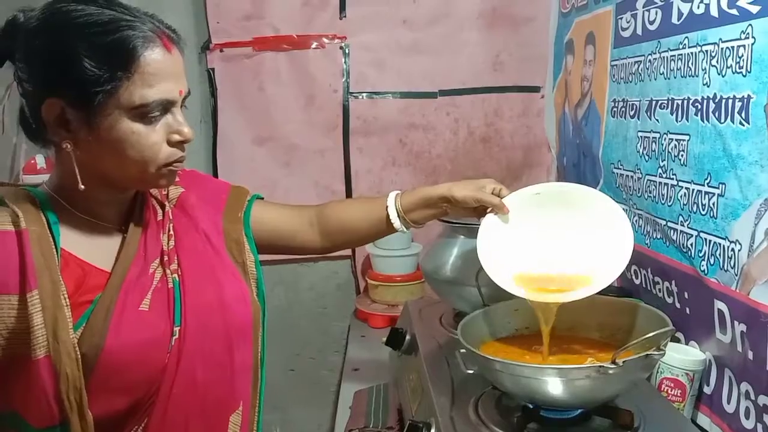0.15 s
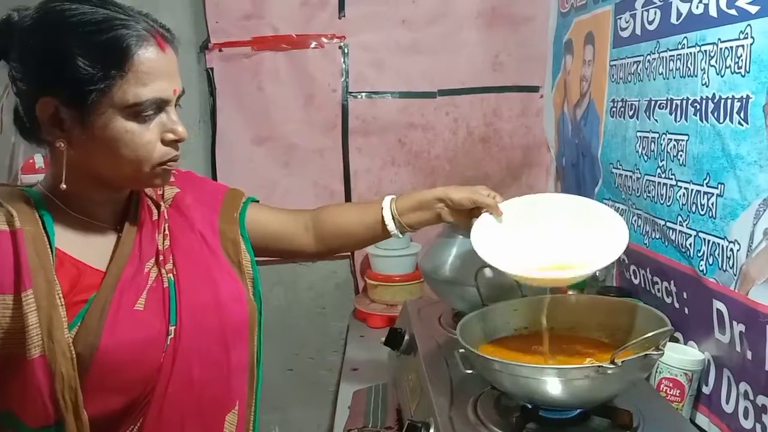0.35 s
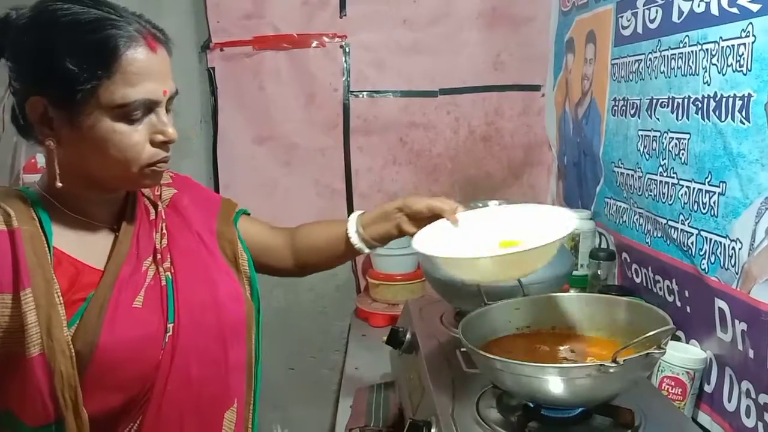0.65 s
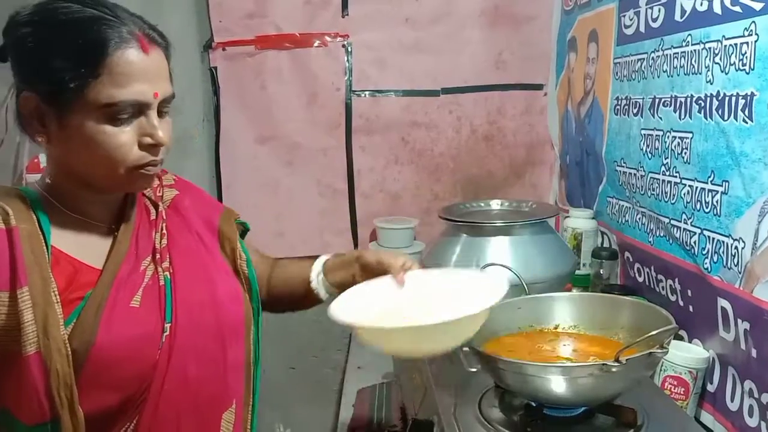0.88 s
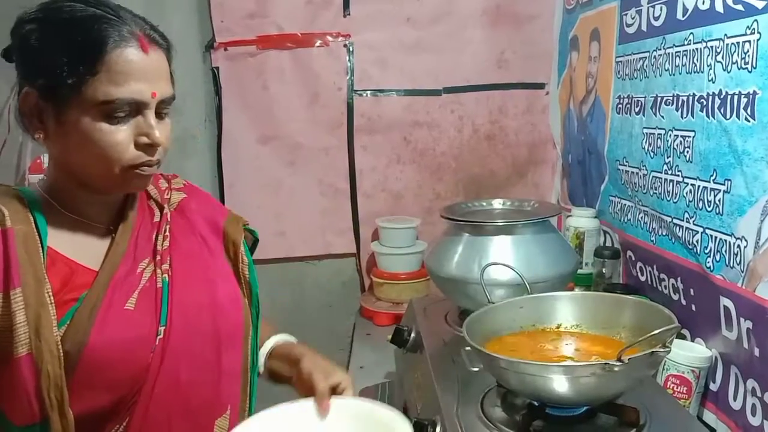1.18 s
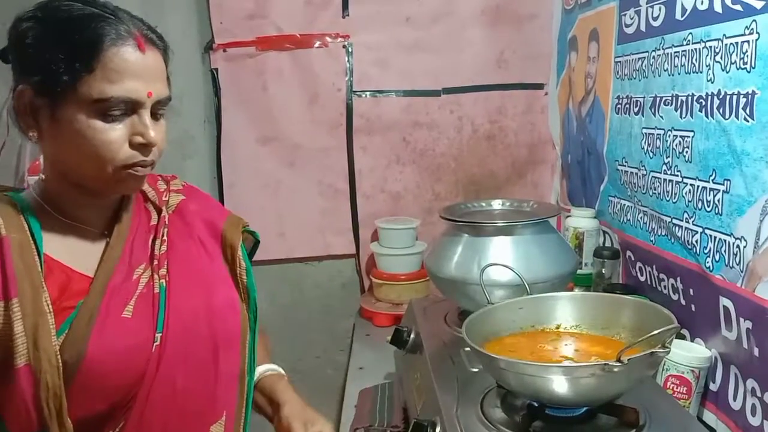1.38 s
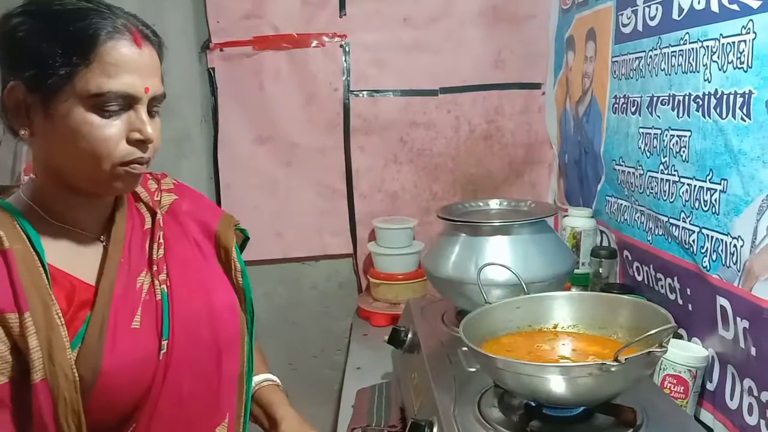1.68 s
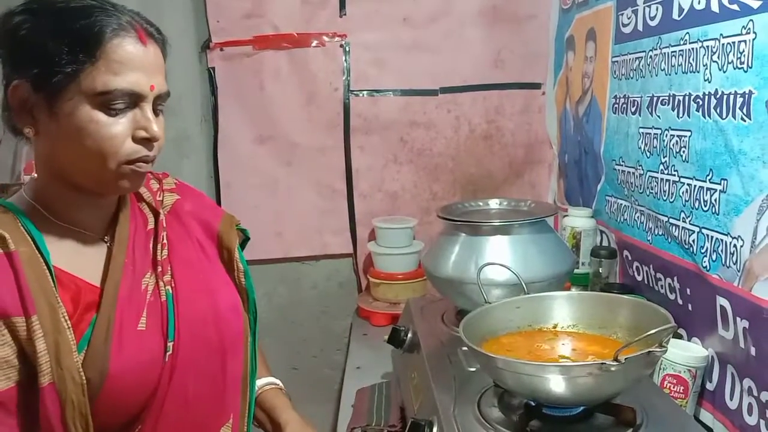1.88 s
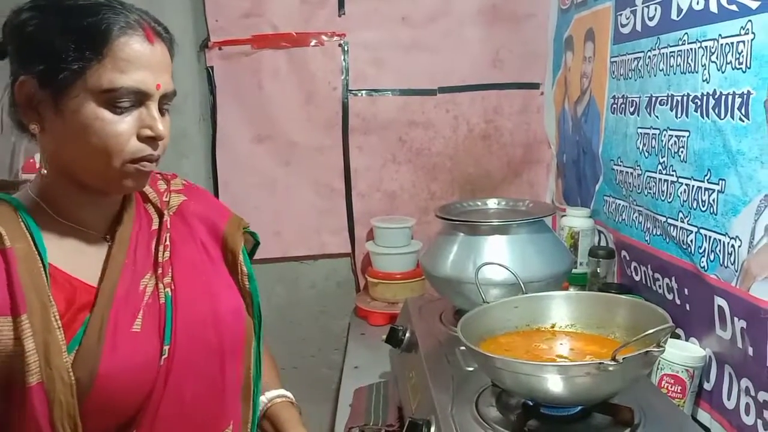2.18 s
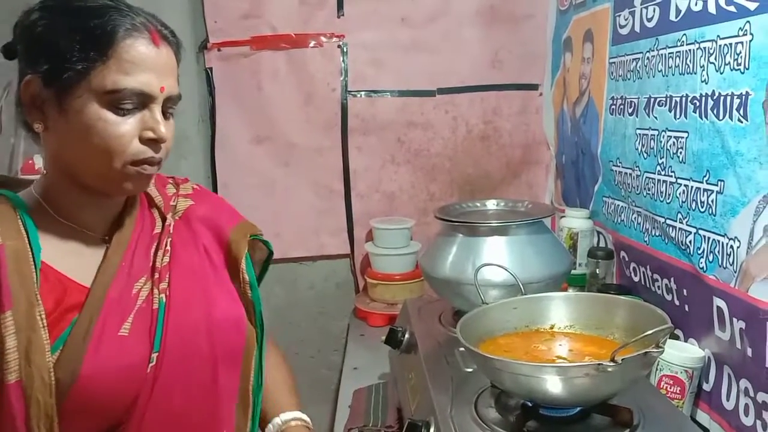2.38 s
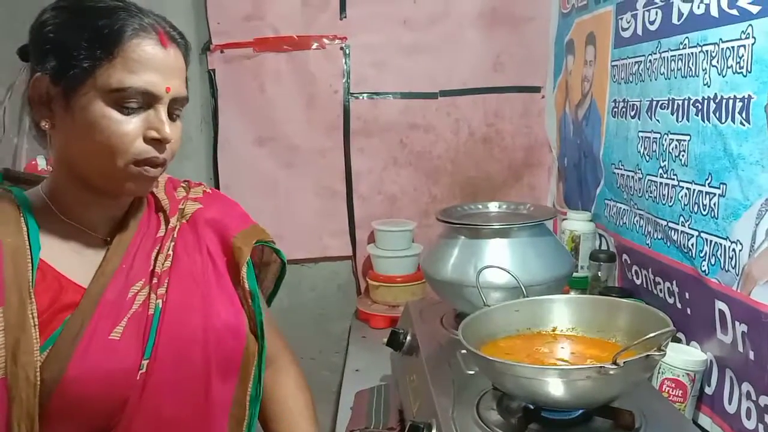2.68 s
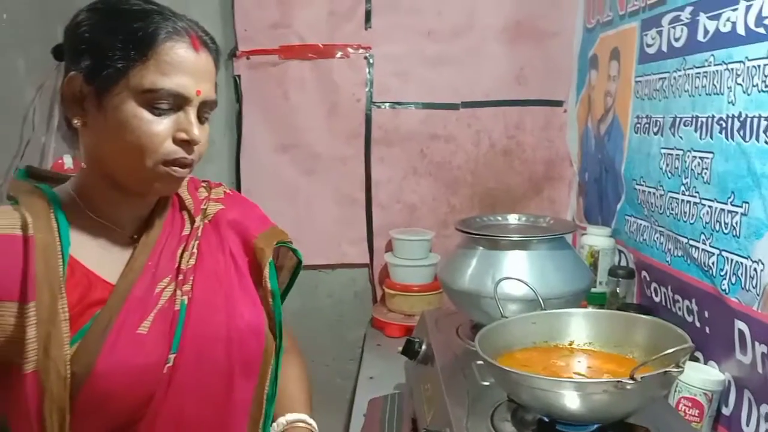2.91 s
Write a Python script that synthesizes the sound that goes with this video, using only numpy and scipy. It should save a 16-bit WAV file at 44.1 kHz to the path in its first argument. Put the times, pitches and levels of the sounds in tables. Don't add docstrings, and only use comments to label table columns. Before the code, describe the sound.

Soft pan simmer with a few drips and bangle clinks, then a bowl scuffs and rings once, then loud steel knocks, gritty dragging and piercing pitch-hopping squeals to the end, in a lightly echoing kitchen.

```python
import sys
import numpy as np
from scipy import signal
from scipy.io import wavfile
from scipy.ndimage import uniform_filter1d

SR = 44100
rng = np.random.default_rng(int(sys.argv[2]) if len(sys.argv) > 2 else 0)


def materialize(psi):
    bounded = np.clip(np.atleast_2d(psi).T, -1, 1)
    quanta = np.round(bounded * 32767).astype(np.int16)
    wavfile.write(sys.argv[1], SR, quanta)


def undo_db(level):
    steps = np.asarray(level, float) / 20
    return 10 ** steps


N = 134505


def evened(x):
    return x / np.sqrt(np.mean(x ** 2) + 1e-20)


def add(mix, start_s, sound):
    part = mix[round(start_s * SR):][:len(sound)]
    part += sound[:len(part)]


def slow(count, hz):
    pole = [1, -np.exp(-2 * np.pi * hz / SR)]
    smooth = signal.lfilter([1], pole, rng.standard_normal(count))
    return evened(signal.lfilter([1], pole, smooth))


def hiss(colour, count, patchy_db, flicker_db):
    frames, hz = count // 128 + 5, np.fft.rfftfreq(512, 1 / SR)
    real, imag, patches = rng.standard_normal((frames, 257, 3)).T
    patches = uniform_filter1d(patches, size=5, axis=0)
    patches = evened(uniform_filter1d(patches, size=20, axis=1))
    flicker = evened(uniform_filter1d(rng.standard_normal(frames), size=3))
    f, db = np.transpose(colour)
    shape = np.interp(np.log(hz + 1), np.log(f + 1), db)[:, None]
    shape = shape + patchy_db * patches + flicker_db * flicker
    noise = signal.istft((real + 1j * imag) * undo_db(shape), nperseg=512, noverlap=384)[1]
    return evened(noise[:count])


def ring(x, hz, width=70):
    r = np.exp(-np.pi * width / SR)
    return signal.lfilter([1 - r], [1, -2 * r * np.cos(2 * np.pi * hz / SR), r * r], x)


def level(curve):
    s, db = np.transpose(curve)
    s = np.r_[s[0] - 0.05, s, s[-1] + 0.05]
    return undo_db(np.interp(np.arange(N) / SR, s, np.r_[-120, db, -120]))


def mode_tone(hz):
    turn = 2 * np.pi * np.cumsum(hz + 8 * slow(len(hz), 33.6)) / SR
    fuzz = slow(len(hz), 45) + 1j * slow(len(hz), 45)
    return np.exp(1j * turn) * (1 + undo_db(-16) * fuzz)


def room_tone():
    # frequency in Hz, level in dB per Hz.
    room_colour = [(80, -2.5), (800, -9), (2200, -1.5), (5800, -18.5), (15000, -14)]
    return undo_db(-55.5 - 3.0) * hiss(room_colour, N, patchy_db=2.5, flicker_db=1.0)


def simmer():
    # time in seconds, level in dB.
    simmer_curve = [(0, -70.5), (.13, -61.5), (.165, -53), (.3, -56.5), (.58, -51.5), (.66, -68),
                    (.73, -58.5), (.81, -41), (.98, -46.5), (1.13, -57), (1.22, -56.5), (1.28, -43),
                    (1.45, -64.5), (1.8, -49.5)]
    # frequency in Hz, level in dB per Hz.
    simmer_colour = [(60, -33), (300, 4.5), (1900, -6.5), (3500, 3), (6500, -10), (15000, -56)]
    # frequency in Hz, level in dB.
    pan_rings = [(85, -27), (370, -11.5), (1270, -10), (2190, -12), (2780, -12.5), (3390, -7.5), (3920, -8),
                 (5670, -10)]
    rings = np.zeros(N)
    for hz, db in pan_rings:
        mode = evened(ring(rng.standard_normal(N), hz))
        rings += undo_db(db) * mode * undo_db(3.5 * slow(N, 6))
    bubbling = hiss(simmer_colour, N, patchy_db=7.0, flicker_db=2.0)
    return level(simmer_curve) * undo_db(-1.0) * (bubbling + rings)


def drips():
    # start in seconds, peak level in dB, pitch in Hz.
    drops = [
        (0.099, -52.5, 5800),
        (0.3805, -46, 3670),
        (0.4385, -36, 5360),
        (0.5291, -29, 4240),
        (0.5826, -41, 4870),
    ]
    out, t = np.zeros(N), np.arange(1500) / SR
    for s, db, hz in drops:
        falling = np.sin(2 * np.pi * hz * (t + 0.00061 * (1 - np.exp(-t / 0.0087))))
        breath = 1 + 1.57 * slow(len(t), 340)
        chirp = falling * breath * undo_db(-60 * t / 0.05)
        tick = np.diff(rng.standard_normal(len(t) + 2), 2) * undo_db(-20 - 60 * t / 0.034)
        add(out, s, undo_db(db - 5.5) * np.minimum(t / 0.0006, 1) * (chirp + tick))
    return out


def bumps():
    # start in seconds, level in dB, pitch in Hz.
    thuds = [(0.823, -57, 80), (1.03, -61.5, 385), (1.788, -46, 87), (1.797, -43.5, 169.4),
             (1.959, -47, 89), (1.951, -47, 239.3), (2.06, -48.5, 244), (2.059, -44, 330),
             (2.071, -45, 460), (2.361, -39.5, 174.7), (2.36, -42.5, 236.6), (2.36, -49, 86),
             (2.471, -45.5, 180.3), (2.53, -53, 84.4), (2.738, -43.5, 83.4), (2.758, -47, 165.7)]
    rise_s, t60_s = 0.019, 0.45
    out, t = np.zeros(N), np.arange(SR // 2) / SR
    for s, db, hz in thuds:
        decay = undo_db(db + 11.5 - 60 * t / t60_s)
        add(out, s, decay * np.minimum(t / rise_s, 1) * mode_tone(hz + 0 * t).real)
    return out


def slide():
    # time in seconds, level in dB.
    slide_curve = [(1.15, -52), (1.165, -45), (1.2, -46), (1.24, -46.5), (1.44, -71)]
    # frequency in Hz, level in dB per Hz.
    slide_colour = [(1500, -17), (2500, -9), (4000, 2), (6000, -3.5), (15000, -29)]
    return level(slide_curve) * hiss(slide_colour, N, patchy_db=5, flicker_db=0.0)


def strikes(rows, modes, colour, ring_db, clatter_db, t60):
    out, t = np.zeros(N), np.arange(SR // 2) / SR
    rise = np.minimum(t / 0.0015, 1)
    low_pass = signal.butter(6, 6500, fs=SR, output="sos")
    for s, db in rows:
        body = np.zeros(len(t))
        for hz, mode_db, mode_t60 in modes:
            uneven = 0.8 + 0.099 * slow(len(t), 40)
            body += undo_db(mode_db - 60 * t / mode_t60) * uneven * mode_tone(hz + 0 * t).real
        noise = hiss(colour, len(t), patchy_db=1.5, flicker_db=1.2)
        dull = signal.sosfilt(low_pass, noise)
        tail = dull * (undo_db(-60 * t / t60) + 1.45 * undo_db(-60 * t / 0.013))
        tail += noise * (0.82 * undo_db(-60 * t / 0.051) + 0.37 * undo_db(-60 * t / 0.22))
        add(out, s, undo_db(db) * rise * (undo_db(ring_db + 0.97 * db) * body + undo_db(clatter_db) * tail))
    return out


def bowl():
    # start in seconds, peak level in dB.
    taps = [
        (1.2346, -16),
    ]
    # frequency in Hz, level in dB, decay t60 in seconds.
    bowl_modes = [(5700, -2, 0.21)]
    # frequency in Hz, level in dB per Hz.
    clack_colour = [(150, -47), (400, -21), (1800, -27), (2600, -7), (5500, -5), (8000, -12.5),
                    (15000, 3.5)]
    return strikes(taps, bowl_modes, clack_colour, ring_db=0.0, clatter_db=-7.0, t60=0.79)


def knocks():
    # start in seconds, peak level in dB.
    blows = [(1.7745, -4.5), (1.7995, -15), (1.8237, -17.5), (1.9868, -22), (2.0517, -18), (2.136, -13),
             (2.3585, -16), (2.6318, -16.5), (2.6603, -8.5), (2.7256, -23), (2.7445, -28.5), (2.819, -22.5),
             (2.9506, -26.5), (3.039, -6.5)]
    # frequency in Hz, level in dB, decay t60 in seconds.
    vessel_modes = [(1110, -23, 0.29), (1265, -12.5, 0.14), (2043, -21, 0.27), (2796, -23.5, 0.16),
                    (3190, -26, 0.17), (3246, -10.5, 0.33), (3520, -4.5, 0.085), (3650, -16, 0.39),
                    (3675, -7.5, 0.13), (3950, -9.5, 0.17), (4200, -21, 0.22), (4900, -20.5, 0.25)]
    # frequency in Hz, level in dB per Hz.
    clatter_colour = [(150, -14), (1270, -15), (2400, -10), (3600, 3), (5900, -15.5), (15000, -22)]
    return strikes(blows, vessel_modes, clatter_colour, ring_db=3, clatter_db=-12.0, t60=0.29)


def scrape(whine):
    # time in seconds, level in dB.
    drag_curve = [(1.9, -67), (1.96, -45.5), (2.06, -34), (2.18, -49.5), (2.33, -42), (2.37, -43),
                  (2.6, -40.5), (2.67, -35.5), (2.84, -36), (2.875, -92), (2.98, -48.5), (3.05, -32)]
    # frequency in Hz, level in dB per Hz.
    grit_colour = [(150, -16), (280, -4), (1300, -5.5), (3400, -1), (6000, -1), (15000, -16.5)]
    grit = hiss(grit_colour, N, patchy_db=5, flicker_db=1.24)
    dull = signal.sosfiltfilt(signal.butter(4, 5000, fs=SR, output="sos"), grit)
    locked = uniform_filter1d(abs(whine), size=3000) / undo_db(-25)
    return undo_db(6.5) * level(drag_curve) * (dull + 0.47 * (grit - dull) / (1 + locked))


def grip(s, length, db, hz, top):
    overlap = 0.11
    u = np.arange(0, 1, 1 / (SR * length * (1 + 2 * overlap)))
    skew = np.log(0.5) / np.log(np.clip(top, 0.1, 0.9))
    size = undo_db(db + 2.5) * abs(np.sin(np.pi * u ** skew)) ** 1.07
    phase = np.angle(mode_tone(hz + 0 * u)) + 2 * np.pi * rng.random()
    return s - overlap * length, size, np.exp(1j * phase)


def squeals():
    # start in seconds, length in seconds, peak level in dB, pitch in Hz, place of the peak from 0 to 1.
    rim_grips = [(2.028, 0.096, -31, 4944, 0.35), (2.125, 0.039, -26.5, 5016, 0.54),
                 (2.164, 0.067, -20.5, 4998.0, 0.53), (2.245, 0.048, -23.5, 4974, 0.23),
                 (2.293, 0.028, -26, 4940, 0.33), (2.323, 0.035, -25, 4950, 0.45),
                 (2.35, 0.013, -23, 5000, 0.5), (2.367, 0.035, -30, 4935, 0.5),
                 (2.409, 0.015, -27.5, 5126.0, 0.6), (2.422, 0.021, -38, 5100, 0.2),
                 (2.21, 0.057, -23.5, 5600, 0.76), (2.27, 0.06, -14.5, 5560.0, 0.61),
                 (2.338, 0.043, -23.5, 5556, 0.42), (2.32, 0.092, -19.5, 2586, 0.62),
                 (2.389, 0.066, -17, 2575.0, 0.61), (2.452, 0.058, -14, 2554, 0.48),
                 (2.519, 0.047, -17, 2569, 0.14), (2.562, 0.017, -22.6, 2595, 0.5),
                 (2.579, 0.017, -23, 2590, 0.33), (2.598, 0.042, -25, 2552, 0.46),
                 (2.595, 0.017, -23.5, 5851.0, 0.7), (2.616, 0.063, -12, 5863, 0.59),
                 (2.685, 0.017, -14.5, 5850, 0.53), (2.701, 0.019, -10, 5840, 0.55),
                 (2.723, 0.018, -15, 5844.0, 0.42), (2.744, 0.019, -18, 5844, 0.38),
                 (2.759, 0.051, -18.5, 5842.0, 0.15), (2.814, 0.025, -24, 5870, 0.6),
                 (2.839, 0.049, -35, 5850, 0.4), (2.872, 0.078, -34, 5810, 0.66),
                 (2.816, 0.017, -19.5, 5326.0, 0.55), (2.828, 0.015, -12, 5307.0, 0.8),
                 (2.843, 0.065, -11.5, 5326.0, 0.57), (2.916, 0.038, -14, 5350, 0.55),
                 (2.949, 0.027, -17.5, 5243, 0.37), (2.976, 0.025, -15.5, 5266, 0.44),
                 (3.0, 0.02, -20, 5334, 0.42), (3.021, 0.012, -20, 5260, 0.6),
                 (3.035, 0.015, -22.5, 5280, 0.34)]
    wall_grips = [(1.199, 0.048, -28.5, 2547.0, 0.79), (1.257, 0.028, -28, 2530.0, 0),
                  (1.291, 0.053, -33.5, 2543.0, 0.1), (1.335, 0.017, -36, 2582.0, 1),
                  (1.209, 0.012, -35, 3936.0, 0.75), (1.231, 0.034, -33.5, 3964.0, 0.23),
                  (1.254, 0.0092, -28, 3912.0, 0.03), (1.272, 0.031, -37.5, 3965.0, 0.3),
                  (1.299, 0.044, -43, 3980.0, 0.61), (2.182, 0.098, -23.5, 2802.0, 0.67),
                  (2.314, 0.036, -31.5, 2768.0, 0.5), (2.826, 0.071, -25.5, 3419.0, 0.45),
                  (2.892, 0.033, -23.5, 3410.0, 0.46), (2.937, 0.029, -26, 3301.0, 0.6),
                  (2.97, 0.018, -27.5, 3286.0, 0.33), (2.985, 0.064, -28.5, 3243.0, 0.44),
                  (2.84, 0.057, -31, 3856.0, 0.6), (2.897, 0.029, -27.5, 3867.0, 0.2),
                  (2.932, 0.041, -27, 3887.0, 0.07), (3.018, 0.024, -32, 3872.0, 0.63),
                  (3.003, 0.02, -23, 5087.0, 0.5), (3.019, 0.035, -16, 4949.0, 0.76)]
    rim_hz = [4985, 5570, 2570, 5850, 5300]
    # levels of the 2nd, 3rd and 4th overtone in dB.
    overtones_db = [
        [-20, -36, -60],
        [-58, -72, -60],
        [-16.5, -30, -28],
        [-24, -60, -60],
        [-23, -35, -61],
    ]
    # start in
    # seconds, length in seconds, pitch in Hz.
    side_squeals = [(2.18, .14, 2167), (2.48, .12, 1940), (2.85, .2, 1925), (2.17, .17, 7162),
                    (2.84, .21, 7268), (2.86, .15, 6840), (2.42, .14, 12750), (2.25, .1, 1270),
                    (.43, .13, 1270), (2.76, .1, 4410), (2.5, .1, 3930)]
    side_db = [-44.5, -44, -47, -44, -37.5, -41.5, -51, -47.5, -53, -49, -39.5]
    # time in seconds, square in dB, cube in dB.
    mixing = [(2.298, -25, 1), (2.55, -27, -50), (2.8, -27, -31), (2.849, -11, -14)]
    z = np.zeros(N, complex)
    for row in rim_grips:
        hz = row[3]
        s, size, wave = grip(*row)
        rich = wave.copy()
        for k, db in enumerate(overtones_db[np.argmin(abs(np.array(rim_hz) - hz))], 2):
            if k * hz < SR / 2.5:
                rich += undo_db(db) * wave ** k
        add(z, s, size * rich)
    for row in wall_grips:
        s, size, wave = grip(*row)
        add(z, s, size * wave)
    for (s, length, hz), db in zip(side_squeals, side_db):
        u = np.arange(0, length, 1 / SR) / length
        swell = undo_db(db + 4.5 + 4.3 * slow(len(u), 15.0)) * np.sin(np.pi * u ** 0.6)
        add(z, s, swell * mode_tone(hz + 0 * u))
    s, square_db, cube_db = np.transpose(mixing)
    t = np.arange(N) / SR
    square = undo_db(np.interp(t, s, square_db)) * z ** 2
    cube = undo_db(np.interp(t, s, cube_db)) * z ** 3
    return (z + square + cube).real


def kitchen(x):
    echoes, at = np.zeros(SR // 2), np.arange(200, SR // 2 - 22, 22)
    signs = rng.choice([-1.0, 1.0], len(at))
    echoes[at + rng.integers(0, 22, len(at))] = signs * undo_db(-60 * at / SR / 0.93)
    echoes = signal.lfilter([1], [1, -0.45], echoes)
    return signal.fftconvolve(x, echoes / np.linalg.norm(echoes))[:N]


def scene():
    sharp = drips() + knocks() + bowl()
    whine = squeals()
    echo = kitchen(undo_db(-13) * sharp + undo_db(-19) * whine)
    background = room_tone() + simmer() + bumps()
    return (background + slide() + sharp + scrape(whine) + whine + echo)[None]


def roll_off(x):
    return signal.sosfilt(signal.butter(12, 15720, fs=SR, output="sos"), x)


def record(dry):
    # frequency in Hz, gain in dB.
    mic = [(35, -34), (78, -3), (7450, -1.5), (8000, -9), (10300, 1), (13200, -11), (14800, -1.5),
           (15700, 1)]
    hz, (f, db) = np.linspace(0, SR / 2, 1025), np.transpose(mic)
    gain = undo_db(np.interp(np.log(hz + 1), np.log(f), db))
    taps = signal.firwin2(2047, hz, gain, fs=SR)
    return roll_off(signal.oaconvolve(dry, taps[None], "same"))


dry = scene()
out = record(dry)
materialize(out)
```